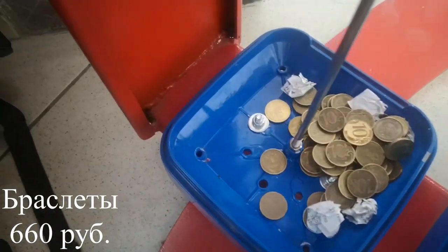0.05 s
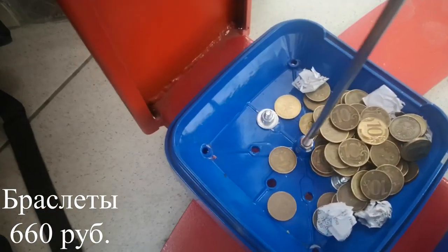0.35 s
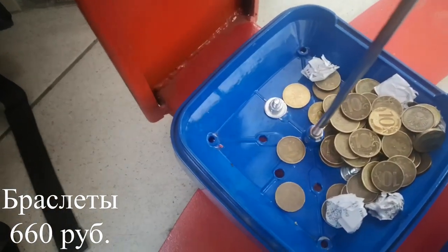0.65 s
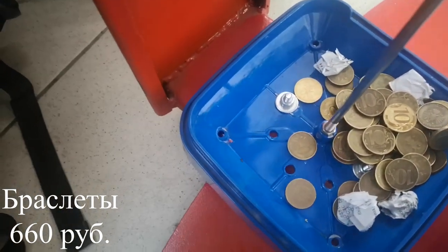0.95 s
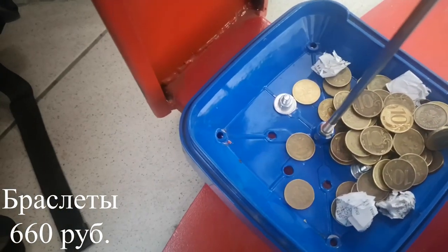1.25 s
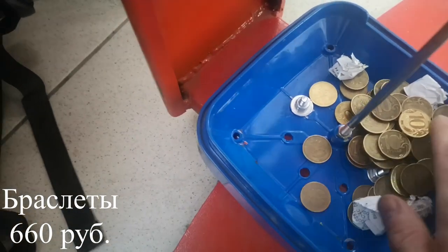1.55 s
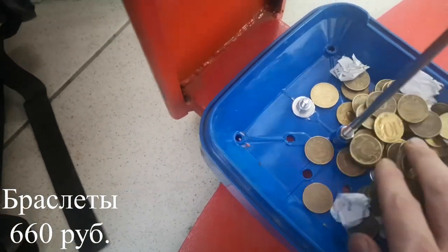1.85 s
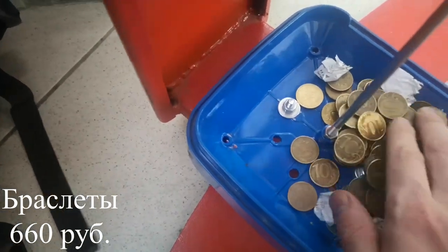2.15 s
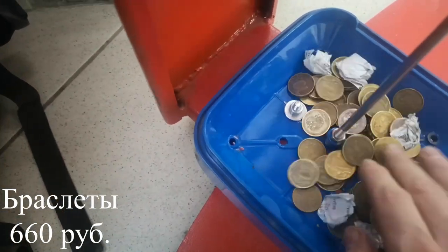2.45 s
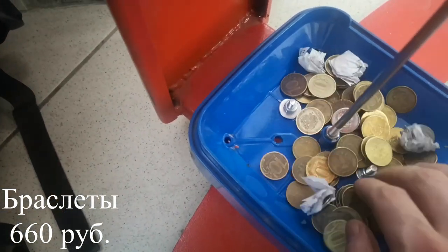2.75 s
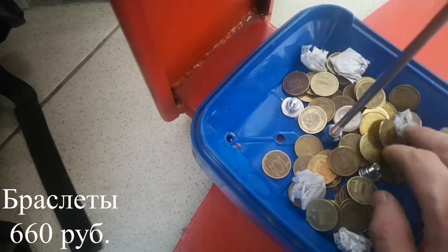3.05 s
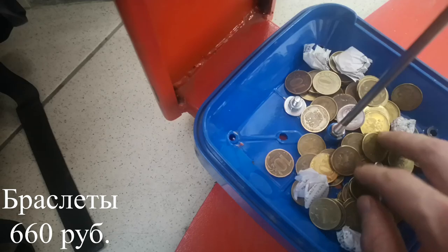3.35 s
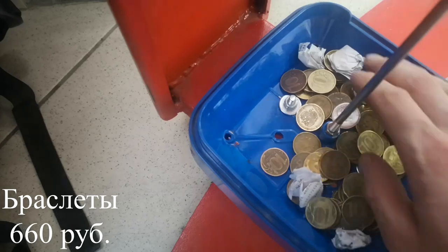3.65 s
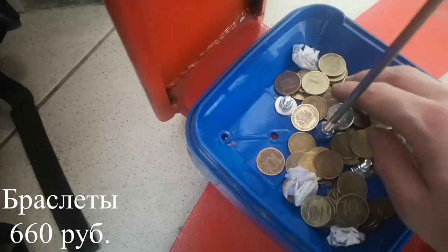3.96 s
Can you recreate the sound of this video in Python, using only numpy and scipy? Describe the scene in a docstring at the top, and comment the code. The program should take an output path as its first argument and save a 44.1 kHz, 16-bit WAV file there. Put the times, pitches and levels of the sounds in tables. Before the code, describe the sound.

Close-up coins clink and chatter as a hand pushes them around a plastic tray, following a faint rustle and a few taps. One wobbles to rest and the tray gets bumped, over a small room's low rumble.

```python
"""Coins stirred by hand in a plastic tray, close to the microphones in a small, hard room.
They knock together in damped clinks, slide over each other in dense chatter and rasp on the floor
of the tray, which rings under them. One falls free and wobbles to rest; last, the hand bumps the tray.
Before the coins come a soft rustle and a few handling knocks; the room rumbles throughout."""
import sys
import numpy as np
from scipy import signal
from scipy.fft import rfft, irfft, next_fast_len
from scipy.io import wavfile
from scipy.ndimage import uniform_filter1d, map_coordinates

SR = 44100
rng = np.random.default_rng(int(sys.argv[2]) if len(sys.argv) > 2 else 0)


def wrap_up_sound(samples):
    """Save the sound to the file named by the first command line argument, as 16-bit audio."""
    columns = np.atleast_2d(samples).T
    # keep every value between -1 and 1, then stretch to whole-number steps
    tamed = np.clip(columns, -1, 1)
    steps = np.round(tamed * 32767).astype(np.int16)
    wavfile.write(sys.argv[1], SR, steps)


N = 176400
BLOW_SAMPLES, ATTACK_S = SR // 4, 0.00054
TRAY_DETUNE = 0.0098  # the shifting load retunes the tray

# coins lying in the heap, one mode each: f/Hz, level/dB, t60/s
HEAP_MODES = [(3488, -7, .07), (3765, -7, .06), (4200, -7, .06), (4662, -5, .06), (4969, -4, .05),
              (5335, -2, .05), (5550, 1, .05), (5749, 2, .06), (5970, -1, .05), (6960, 3, .05),
              (7176, 2, .04), (7860, 2, .05), (8130, 2, .05), (9650, 3, .04)]
# plastic tray: f/Hz, level/dB, t60/s
TRAY_MODES = [(744, -15, 0.038), (878, -9, 0.062), (990, -6, 0.1), (1253, -3.5, 0.14), (1296, -1, 0.074),
              (1343, -3, 0.046), (1612, -2, 0.1), (1710, 0.5, 0.091), (1838, -2, 0.09),
              (2000, -11.5, 0.057), (2140, -9, 0.055), (2507, -4, 0.11), (2812, -2.5, 0.062),
              (3350, -19, 0.084)]
# spectrum of a metal contact: f/Hz, level/dB
CONTACT_COLOUR = [(100, -48), (500, -27.5), (900, -16.5), (1700, -13.5), (2400, -9.5), (4200, -6.5),
                  (5200, -0.5), (6000, -4.5), (7000, 1.5), (8300, -1.5), (9500, -5), (11000, -19.5),
                  (12500, -21.5), (15000, -23)]


def amp(db):
    """Decibels to gain."""
    return 10 ** (np.asarray(db) / 20)


def unit(x):
    """Scale to rms 1."""
    return x / np.sqrt(np.mean(x ** 2) + 1e-20)


def along(points, hz):
    """Interpolate (f/Hz, value) points on a log axis."""
    f, v = np.transpose(points)
    return np.interp(np.log(hz + 1), np.log(f + 1), v)


def curve(points):
    """Interpolate (t/s, value) points per sample."""
    return np.interp(np.arange(N) / SR, *np.transpose(points))


def wander(knots, at):
    """Smooth random curve, read at fractional knot positions."""
    return map_coordinates(rng.standard_normal(knots), [at], mode="mirror")


def filtered(x, response):
    """Apply a frequency response."""
    n = x.shape[-1]
    m = next_fast_len(n + 2048)
    return irfft(rfft(x, m) * response(np.fft.rfftfreq(m, 1 / SR)), m)[..., :n]


def noise(colour, size):
    """Coloured noise of rms 1, channels unrelated."""
    return unit(filtered(rng.standard_normal((2, size)), lambda hz: amp(along(colour, hz))))


def add(track, at_s, sound):
    """Mix a sound in."""
    i = round(at_s * SR)
    part = track[:, i:i + sound.shape[1]]
    part += sound[:, :part.shape[1]]


def burst(colour, t60_s, attack_s=ATTACK_S, ripple_db=3):
    """Dying crack with broad random resonances, partly common to both channels, later on the left."""
    ripple_width_hz, correlation, left_lag_s = 280, 0.3, 0.00058
    t = np.arange(BLOW_SAMPLES) / SR
    ripple = lambda hz: amp(ripple_db * wander(200, hz / ripple_width_hz))
    mid, side = unit(filtered(noise(colour, BLOW_SAMPLES), ripple))
    angle = np.arccos(correlation) / 2
    pair = np.cos(angle) * mid + np.sin(angle) * np.array([side, -side])
    pair = filtered(pair, lambda hz: np.exp(-2j * np.pi * hz * np.array([[left_lag_s], [0]])))
    envelope = np.exp(-np.log(1000) * t / t60_s) * (1 - np.exp(-t / attack_s))
    return pair * envelope * (1 + 10 * attack_s / t60_s)  # make-up gain for a slow attack


def ring(modes, spread_db=6, detune=0.0027):
    """Damped modes, struck with new strengths at each blow; low ones reach both channels alike."""
    apart_hz = 1670  # channel phases diverge above this
    t = np.arange(BLOW_SAMPLES) / SR
    hz, db, t60_s = np.transpose(modes)
    phase = 2 * np.pi * rng.random(len(hz)) + rng.standard_normal((2, len(hz))) * hz / apart_hz / 2
    hz = hz * (1 + detune * rng.standard_normal(len(hz)))
    gain = amp(db + spread_db * rng.standard_normal(len(hz))) * np.exp(1j * phase)
    waves = np.exp(np.outer(2j * np.pi * hz - np.log(1000) / t60_s, t))
    return (gain @ waves).real * (1 - np.exp(-t / ATTACK_S))


def room(x):
    """Reverberation from hard walls; the treble dies first."""
    # decay: f/Hz, t60/s
    decay = [(200, 1), (800, 0.25), (2000, 0.74), (5000, 0.44), (9000, 0.21), (14000, 0.15)]
    # tail spectrum: f/Hz, gain/dB
    colour = [(200, 6.5), (1000, -3), (2000, 1.5), (5000, -6), (9000, -7.5), (14000, -2)]
    build_up_s = 0.0016
    bands_hz, t, spectra = signal.stft(rng.standard_normal((2, SR * 3 // 4)), SR, nperseg=256)
    t60_s = along(decay, bands_hz)[:, None]
    spectra = spectra * np.exp(-np.log(1000) * t / t60_s) / np.sqrt(t60_s)
    tail = signal.istft(spectra, SR, nperseg=256)[1]
    tail = filtered(tail / np.linalg.norm(tail[0]), lambda hz: amp(along(colour, hz)))
    tail *= 1 - np.exp(-np.arange(tail.shape[1]) / SR / build_up_s)
    return signal.fftconvolve(x, tail, axes=1)[:, :N]


def rumble():
    """Low room noise, nearly mono in the bass, and a faint wavering hum; both swell slowly."""
    # noise spectrum: f/Hz, level/dB
    colour = [(20, -5), (103, -3), (151, -10.5), (178, -15.5), (217, -14), (328, -22), (380, -15.5),
              (511, -28), (1000, -25), (2000, -28), (3200, -37.5), (4300, -39), (5000, -43.5),
              (8000, -44.5), (10500, -58), (15000, -57)]
    # left-right likeness: f/Hz, correlation
    likeness = [(30, 0.99), (80, 0.98), (160, 0.98), (300, 0.039), (1000, -0.16)]
    # hum lines: f/Hz, level/dB
    hum_lines = [(60, -54), (214, -60.5), (1020, -71.5), (4200, -82.5)]
    # swell: t/s, gain/dB
    swell = [(0, 3.5), (.4, 1.5), (.7, 1), (1.15, 1.5), (1.5, -1), (2.5, 0.5), (3.3, 2.5), (3.7, 3),
             (4, 4.5)]
    angle = lambda hz: np.arccos(along(likeness, hz)) / 2
    mid, side = filtered(noise(colour, N), lambda hz: np.array([np.cos(angle(hz)), np.sin(angle(hz))]))
    out = amp(-45) * unit(np.array([mid + side, mid - side]))
    t = np.arange(N) / SR
    for hz, db in hum_lines:
        drift_rad = uniform_filter1d(4 * np.cumsum(rng.standard_normal(N)) / np.sqrt(SR), size=2000)
        out += amp(db) * np.sqrt(2) * np.sin(2 * np.pi * hz * t + drift_rad)
    return amp(curve(swell)) * out


def rustle():
    """Soft hiss that swells and dies away."""
    # envelope: t/s, level/dB
    envelope = [(0, -44.5), (.29, -43.5), (.37, -40.5), (.43, -45.5), (.48, -48.5), (.65, -54),
                (.85, -52.5), (1.05, -65), (1.4, -92)]
    # spectrum: f/Hz, level/dB
    colour = [(100, -5), (500, -10), (1000, -6), (2100, -1.5), (3600, -4.5), (4300, -6.5), (5600, -3.5),
              (6300, -4.5), (7700, -2), (8500, -7.5), (10200, -16.5), (15000, -28)]
    return amp(curve(envelope)) * noise(colour, N)


def handling():
    """Small, nearly dry knocks on the casing: mono ring and low thump, then a bright click."""
    # knocks: t/s, casing level/dB, click level/dB, thump level/dB
    knocks = [(0.149, -30.5, -52, -42.5), (.205, -37.5, -54, -42), (0.547, -42, -62, -48),
              (0.8329, -30.5, -24.5, -32.5)]
    # casing: f/Hz, level/dB, t60/s
    casing_modes = [(252, -6, 0.098), (398, -1, 0.025), (792, -2, 0.059), (900, -3, 0.016),
                    (1294, -6.5, 0.033), (1860, -12, 0.037), (2420, -7.5, 0.028)]
    # click spectrum: f/Hz, level/dB
    click_colour = [(200, 2), (1800, 1), (3600, -6), (4600, -7), (6000, 5), (8000, -2), (10200, -17),
                    (11400, -11), (15000, -23)]
    # click ring: f/Hz, level/dB, t60/s
    click_modes = [(1825, -5.5, 0.03), (2610, -1.5, 0.034), (3650, 1, 0.032), (5750, -5, 0.044),
                   (7000, -6, 0.036), (7840, -2, 0.057)]
    # thump spectrum: f/Hz, level/dB
    thump_colour = [(20, 5), (60, -0.5), (140, 1), (220, -13), (400, -30), (2000, -64)]
    click_delay_s = 0.0034
    taps, thumps = np.zeros((2, 2, N))
    for at_s, casing_db, click_db, thump_db in knocks:
        add(taps, at_s, amp(casing_db) * ring(casing_modes, spread_db=3)[:1])
        click = burst(click_colour, t60_s=0.028, attack_s=0.0015, ripple_db=0.5)
        click += amp(-6.5) * ring(click_modes, spread_db=1)
        add(taps, at_s + click_delay_s, amp(click_db) * click)
        add(thumps, at_s, amp(thump_db) * burst(thump_colour, t60_s=0.34, attack_s=0.0093)[:1])
    return taps + thumps + amp(-6) * room(taps)


def sliding():
    """Many tiny contacts; the coins rub in turns, each adding its own note and ringing the tray."""
    # push of the hand's sweeps: t/s, level/dB
    sweeps = [(1.71, -57), (1.745, -36), (1.785, -38), (1.8, -68), (1.85, -54), (1.885, -30), (1.94, -31.5),
              (1.97, -28.5), (2.02, -27), (2.06, -35.5), (2.1, -38), (2.13, -30.5), (2.18, -35.5),
              (2.25, -62), (2.29, -39), (2.31, -39), (2.35, -31.5), (2.38, -28.5), (2.43, -24.5),
              (2.53, -29), (2.56, -27.5), (2.605, -23.5), (2.67, -30), (2.735, -40), (2.77, -26.5),
              (2.805, -35.5), (2.87, -25.5), (2.9, -32.5), (2.95, -38), (3.02, -40.5), (3.15, -44),
              (3.29, -41.5), (3.38, -72), (3.43, -52), (3.465, -31), (3.49, -57), (3.522, -40.5),
              (3.535, -35.5), (3.6, -28), (3.63, -48), (3.72, -47.5), (3.79, -39.5), (3.83, -62),
              (3.935, -63), (3.96, -35), (4, -61)]
    contacts_per_s, spread_db, turns_per_s, turn_db = 1100, 4, 25, 7
    damped_tray = np.array(TRAY_MODES) * [1, 1, 0.63]  # the pressing hand shortens the ring
    push = amp(curve(sweeps) + 2.5) * (np.arange(N) > sweeps[0][0] * SR)
    grid_s = np.arange(N // 100) * 100 / SR
    out = np.zeros((2, N))
    for coin in HEAP_MODES:
        turn = np.tanh(curve(np.column_stack([grid_s, wander(400, grid_s * turns_per_s)])))
        touches = rng.random(N) < contacts_per_s / len(HEAP_MODES) / SR
        strength_db = spread_db * np.clip(rng.standard_normal(N), -2, 2) + turn_db * turn
        force = unit(touches * amp(strength_db)) * push
        metal = unit(burst(CONTACT_COLOUR, t60_s=0.011) + amp(-8) * ring([coin], spread_db=1))
        tray = amp(-16.5) * unit(ring(damped_tray, detune=TRAY_DETUNE))
        out += signal.oaconvolve(force[None], metal + tray, axes=1)[:, :N]
    return out / np.sqrt(len(HEAP_MODES) * BLOW_SAMPLES)


def clinks():
    """Coin hits coin: a crack of chatter, the struck coin's split note, the ring of heap and tray."""
    # blows, levels relative: t/s, metal level/dB, tray level/dB, rim level/dB,
    # note f/Hz, note level/dB, chatter t60/s, chatter attack/s
    blows = [(1.724, -22.5, -45, -5, 7000, 4, 0.046, 0.0002),
             (1.755, -13, -33.5, -6, 7730, 1.5, 0.033, 0.0004),
             (1.782, -18, -35, -8, 11200, -10, 0.025, .002),
             (1.814, -13, -55, -28, 5070, -3, 0.033, 0.00052),
             (1.853, -19.5, -37.5, -9, 8050, -3, 0.034, 0.00044),
             (1.864, -16, -49, -15, 7400, -3, 0.036, .0005),
             (1.8858, -13.5, -29.5, -7, 7800, 0, 0.06, 0.0007),
             (1.913, -3.5, -27.5, -14.5, 4990, -3.5, 0.048, 0.0036),
             (1.962, -15, -49, -3, 7210, 1, 0.24, 0.0013), (1.98, -14, -38, -11, 3850, -9, 0.074, .001),
             (2.001, -14, -50, -15, 8060, 1, 0.058, 0.0012), (2.011, -14, -44, -13, 4670, -6, 0.055, .001),
             (2.035, -16.5, -33, -12, 6800, -2, .06, .002),
             (2.198, -26, -45, -23, 6960, 6.5, 0.044, 0.00041),
             (2.271, -11.5, -50, -32, 6800, 5, 0.042, 0.00028),
             (2.301, -5, -38, -29, 5060, -4.5, 0.0081, .0005),
             (2.310, -14, -41, -33, 5540, 3.5, 0.028, .0005),
             (2.359, -3, -27.5, -13.5, 5170, -1, 0.027, 0.0019),
             (2.425, -10, -38, -8, 6930, -7, 0.027, .001), (2.43, -7.5, -37, -22, 5620, 2, 0.035, 0.0022),
             (2.434, -17, -48, -20, 4640, 2, 0.027, .001), (2.449, -15, -46, -18, 5580, 8, 0.02, .001),
             (2.461, -11, -48, -15, 8300, 6, 0.032, 0.0006), (2.4738, -4, -53, -30, 6970, -3, 0.018, .0008),
             (2.478, -6, -47, -13, 8200, -4, 0.048, .0015), (2.486, -9.5, -42, -17, 5550, 8.5, 0.055, .001),
             (2.514, -5, -30.5, -9.5, 5800, -4, 0.06, 0.00092),
             (2.52, -10, -45, -22, 8050, -2, 0.026, .001), (2.525, -6.5, -46, -20, 3760, 0, 0.027, .001),
             (2.538, -9.5, -42, -18, 5790, 5, 0.041, 0.0011),
             (2.587, -9.5, -28.5, -7.5, 5240, -2, 0.041, 0.0015),
             (2.601, -11, -28, -7, 6100, 0, 0.15, 0.0014), (2.685, -7, -53, -11, 6830, -10, 0.068, 0.00026),
             (2.711, -9, -38, -27, 6930, -3, 0.055, 0.0025),
             (2.748, -10.5, -38, -9, 7080, 3, 0.089, 0.0007), (2.77, -8, -56, -15, 6950, -1.5, .04, 0.0024),
             (2.816, -13.5, -47, -18, 5760, -5, 0.04, 0.00065),
             (2.8322, -8.5, -35, -16, 8400, 2.5, 0.036, 0.00095),
             (2.859, -6.5, -43, -35, 5700, 3.5, 0.031, 0.0045),
             (2.872, -11.5, -58, -30, 5745, 5, 0.015, 0.00092),
             (2.879, -10, -58, -29, 6430, 4.5, 0.023, 0.0013),
             (2.962, -3, -30.5, -35, 5210, -5, 0.035, 0.00038),
             (2.982, -4.5, -50, -43, 5170, 2, 0.037, 0.00057),
             (3.01, -14, -36, -38, 5230, -17, 0.042, 0.0016),
             (3.164, -19.5, -53, -27, 7350, -3, 0.025, 0.00049),
             (3.214, -11.5, -49, -25, 6310, -2.5, 0.054, 0.00085),
             (3.276, -17.5, -43, -12, 7740, -12, 0.043, 0.0011),
             (3.322, -16, -49, -20, 7400, -11, 0.026, 0.00042),
             (3.333, -18.5, -48, -33, 7700, -2, 0.025, 0.00085),
             (3.398, -22.5, -50, -30, 7070, 3.5, 0.072, .0005),
             (3.4248, -15.5, -66, -16.5, 7300, 6, 0.057, 0.00075),
             (3.448, -13.5, -61, -25, 5180, 2, 0.028, .001),
             (3.536, -8.5, -55, -13, 5180, -22, 0.055, 0.0027),
             (3.655, -9.5, -41.5, -45, 7640, -14, 0.038, 0.00045),
             (3.740, -20.5, -41, -12, 7100, 1, 0.041, 0.00039),
             (3.773, -21.5, -48, -7, 7460, -1, 0.042, 0.00077),
             (3.945, -14.5, -53, -9, 5180, 2.5, 0.03, 0.0021),
             (3.967, -12, -46, -11, 5070, -1, 0.036, 0.0019)]
    # split note: ratio to note f, level/dB, t60/s
    note_modes = [(.94, -12, .025), (1, -3, .06), (1.02, -10, .04), (1.07, -12, .025)]
    # sharp rim-on-rim contact: f/Hz, level/dB
    rim_colour = [(100, -70), (8000, 11), (11000, 14.5), (15000, -1)]
    out = np.zeros((2, N))
    for at_s, metal_db, tray_db, rim_db, note_hz, note_db, t60_s, attack_s in blows:
        chatter = burst(CONTACT_COLOUR, t60_s, attack_s)
        note = amp(note_db) * ring(np.array(note_modes) * [note_hz, 1, 1], spread_db=0)
        heap = amp(-22) * ring(HEAP_MODES)
        rim = amp(rim_db + 2.5) * burst(rim_colour, t60_s=0.04)
        tray = amp(tray_db - 6.5) * ring(TRAY_MODES, spread_db=3, detune=TRAY_DETUNE)
        add(out, at_s, amp(metal_db - 8.5) * (chatter + note + heap + rim) + tray)
    return out


def dragging():
    """Coins pressed on the plastic floor slip in tiny steps and make it rasp."""
    # envelope: t/s, level/dB
    envelope = [(2.85, -71), (3.0, -48), (3.2, -45), (3.33, -46.5), (3.42, -67), (3.56, -49), (3.72, -51),
                (3.92, -70)]
    # tray floor: f/Hz, level/dB, t60/s
    floor_modes = [(1733, -1, 0.02), (1910, -4, 0.016), (2760, -1, 0.016), (4100, -7, .03)]
    slips_per_s = 1000
    slips = (rng.random(N) < slips_per_s / SR) * rng.standard_normal(N)
    rasp = unit(signal.oaconvolve(slips[None], ring(floor_modes, spread_db=1), axes=1)[:, :N])
    return rasp * amp(curve(envelope)) * (np.arange(N) > envelope[0][0] * SR)


def free_coin():
    """A coin drops, bounces and wobbles to rest, ringing longer than those in the heap."""
    # bounces: t/s, level/dB
    bounces = [(2.962, -27), (2.982, -26.5), (3.012, -37)]
    # free coin: f/Hz, level/dB, t60/s
    coin_modes = [(3480, -12, .1), (4962, -2, .11), (5045, -6, .1), (5115, -1, .12), (6575, -1, .08),
                  (6781, -2, .08), (7384, -4, .06), (8350, -3, .06), (13950, 0, .04)]
    # wobbling coin: f/Hz, level/dB, t60/s
    wobble_modes = [(4965, -3, .06), (5050, -3, .06), (5110, 0, .06)]
    wobble_start_s, wobble_end_s, wobble_taps = 3.055, 3.145, 12
    out = np.zeros((2, N))
    for at_s, db in bounces:
        add(out, at_s, amp(db) * ring(coin_modes, spread_db=1.5))
    for at_s in np.linspace(wobble_start_s, wobble_end_s, wobble_taps):
        add(out, at_s, amp(-36) * ring(wobble_modes, spread_db=4))
    return out


def tray_bumps():
    """Soft blows of the hand reach only the tray's lower modes: a hollow knock."""
    # bumps: t/s, level/dB
    bumps = [(3.943, -37), (3.957, -34), (3.966, -30)]
    cutoff_hz = 1730
    out = np.zeros((2, N))
    for at_s, db in bumps:
        add(out, at_s, amp(db) * ring(TRAY_MODES, spread_db=4))
    return filtered(out, lambda hz: 1 / (1 + (hz / cutoff_hz) ** 8))


def scene():
    """All sources in the room, the tray to the right of the microphones."""
    # tray balance: f/Hz, left minus right/dB
    pan = [(200, -8), (700, -6), (1300, -2.5), (2400, -3.5), (4500, -1.5), (6500, 0.5), (9000, -6.5),
           (15000, -3)]
    coins = clinks() + tray_bumps() + sliding() + dragging() + free_coin()
    near = filtered(coins, lambda hz: amp(np.array([[0.5], [-0.5]]) * along(pan, hz))) + rustle()
    return near + room(near) + handling() + rumble()


def record(dry):
    """Steep low-pass band limit."""
    top_hz = 15200
    return filtered(dry, lambda hz: 1 / np.sqrt(1 + (hz / top_hz) ** 180))


dry = scene()
out = record(dry)
wrap_up_sound(out)
```